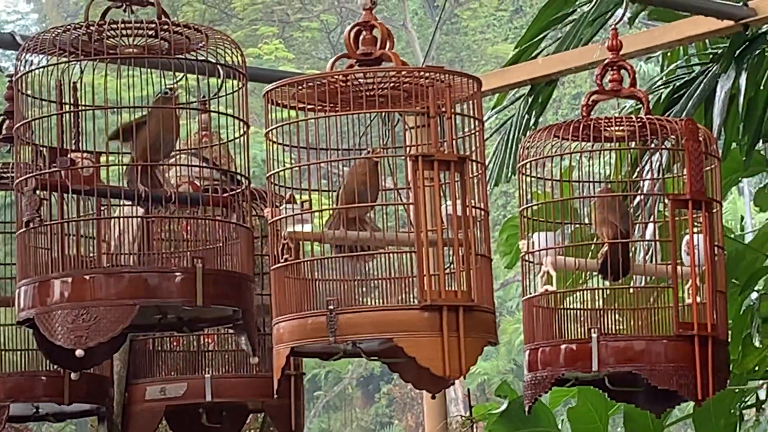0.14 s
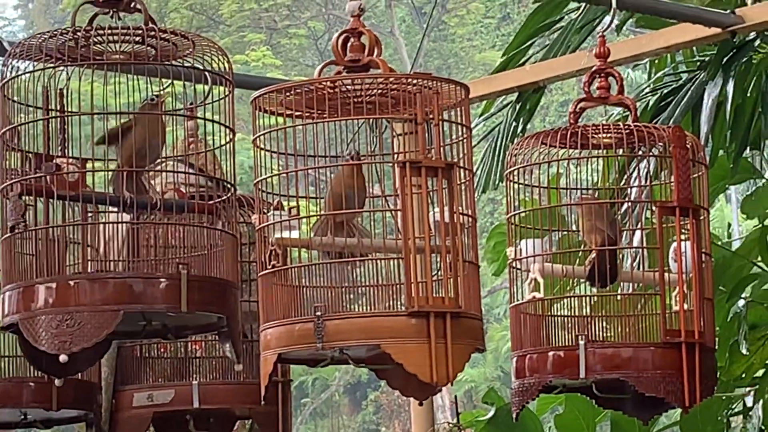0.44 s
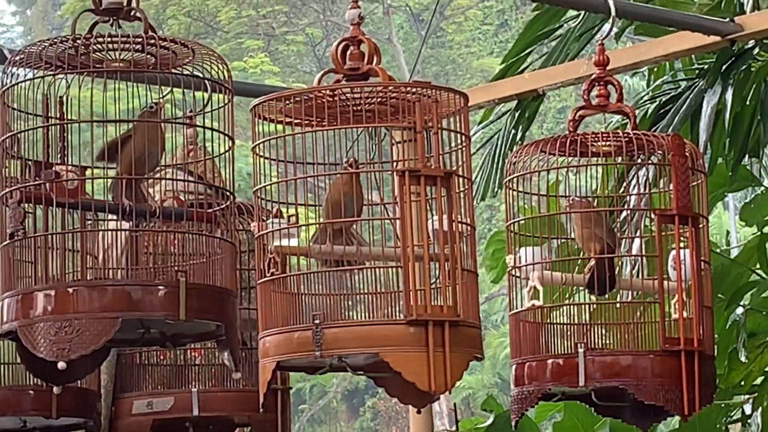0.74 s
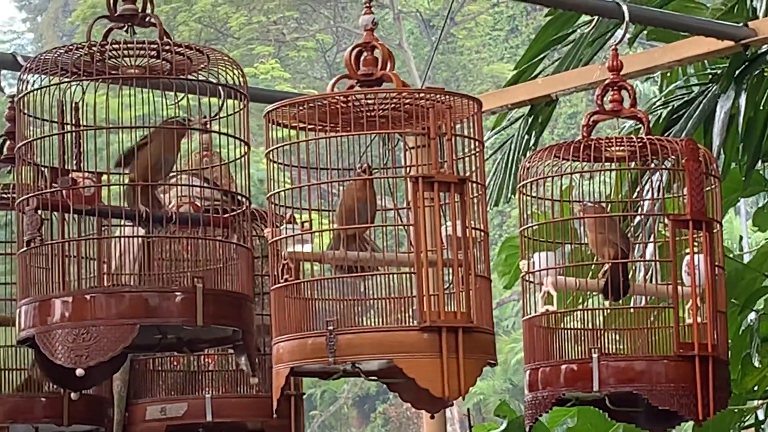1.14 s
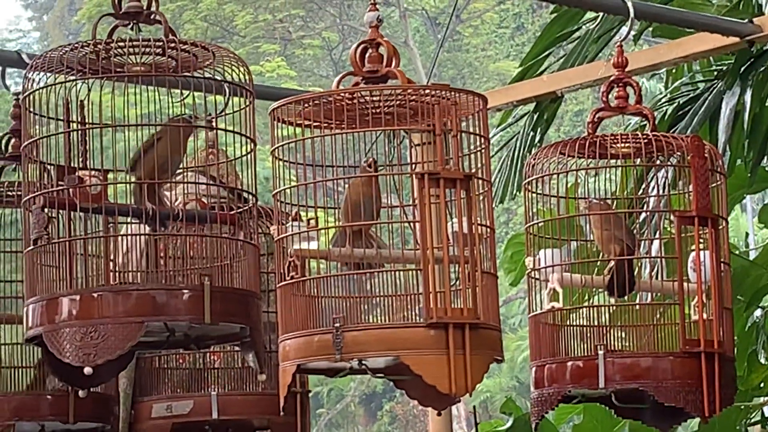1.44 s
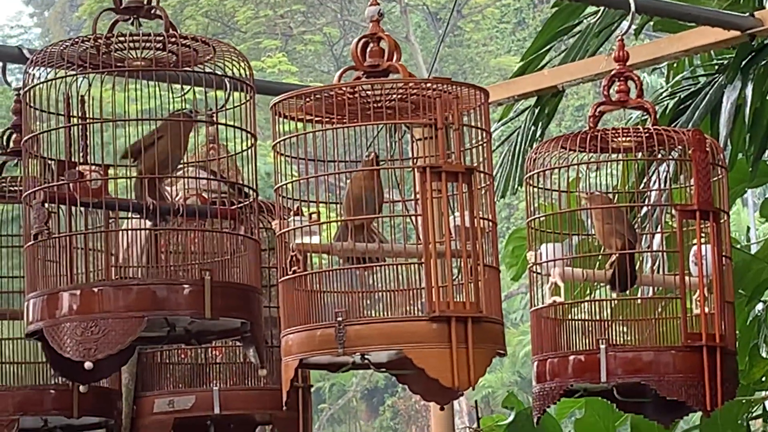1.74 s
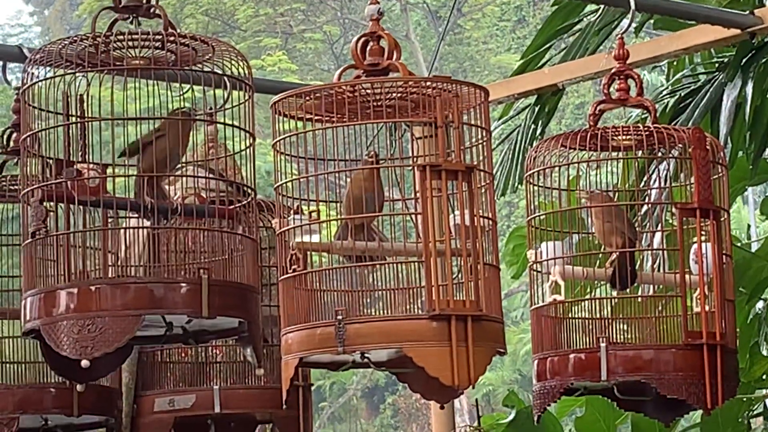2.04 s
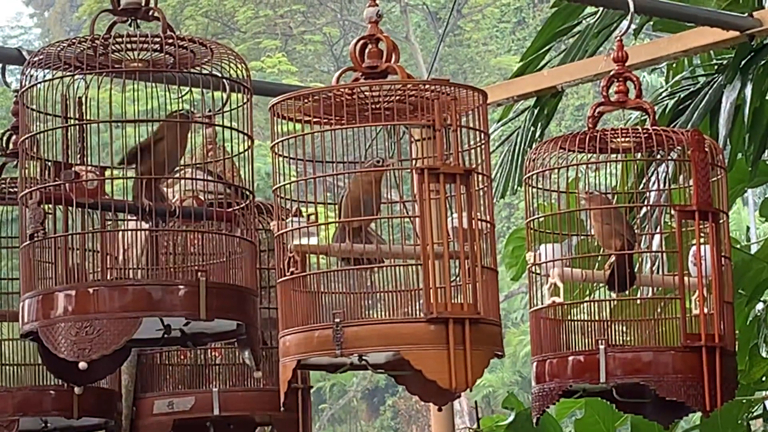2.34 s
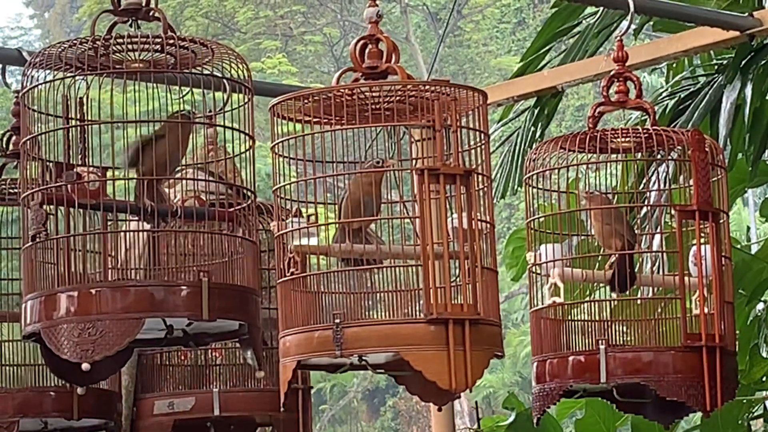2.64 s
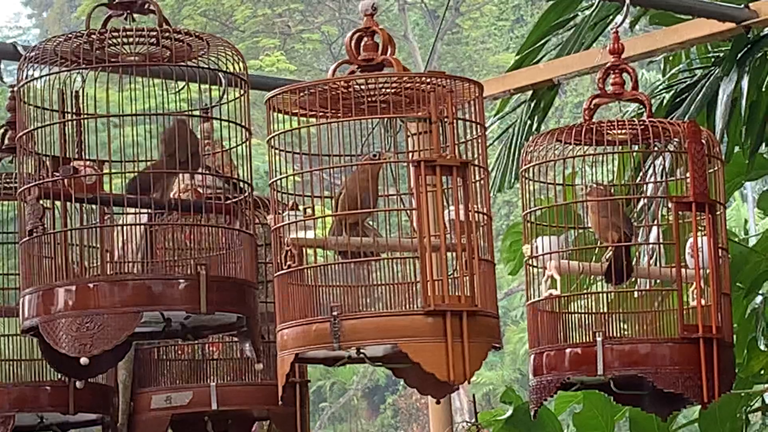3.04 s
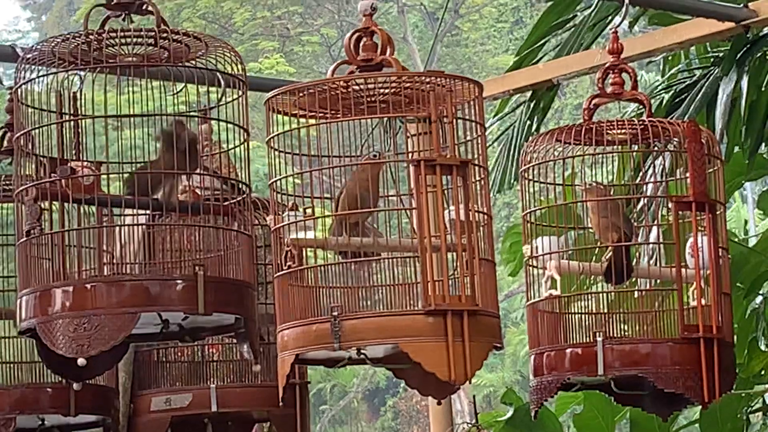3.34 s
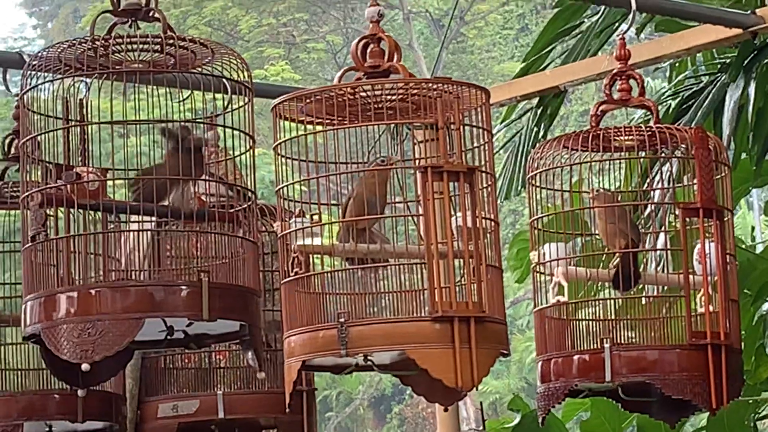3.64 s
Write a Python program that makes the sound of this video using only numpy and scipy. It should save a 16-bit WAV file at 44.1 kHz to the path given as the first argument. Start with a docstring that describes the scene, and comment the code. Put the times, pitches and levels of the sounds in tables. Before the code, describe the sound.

Several caged songbirds sing together under a garden roof: a close bird's loud swooping whistles, a quick repeated hooked note and buzzy warbles, with short leafy echoes, faint traffic rumble and air hiss, picked up in stereo.

```python
"""A garden roof, with several caged songbirds singing over one another: clear swept whistles, a repeated
hooked note, buzzy warbles, a wide rattle and fainter notes from farther cages, all in leafy echoes.
A distant engine revs now and then over a low traffic rumble and air hiss.
Voices and engine are sines on drawn pitch curves with overtones and a fast swing of pitch; the air in
the buzzes, the rumble and the hiss are shaped noise, and the echoes a dying burst of noise."""
import sys
import numpy as np
from scipy import signal
from scipy.fft import rfft, irfft, next_fast_len
from scipy.io import wavfile
from scipy.ndimage import uniform_filter1d, map_coordinates

SR = 44100
rng = np.random.default_rng(int(sys.argv[2]) if len(sys.argv) > 2 else 0)


def materialize(psi):
    """Save the field psi as 16-bit PCM at rate SR to the path in sys.argv[1].

    A 1-D psi becomes a single channel; in a 2-D psi each row is a channel.
    """
    bounded = np.clip(np.atleast_2d(psi).T, -1, 1)
    quanta = np.round(bounded * 32767).astype(np.int16)
    wavfile.write(sys.argv[1], SR, quanta)


N = 167580

# Levels of notes are those of the fundamental, before beak colour, flutter and panning.
# whistles of the nearest bird, one list per note: [t/s, f/Hz, level/dB]
NEAR_WHISTLES = [
    [(0.065, 4065, -47), (0.081, 3358, -24), (0.089, 3234, -22.5), (0.125, 2725, -22.5), (0.141, 3070, -21),
     (0.179, 4126, -19), (0.199, 3832, -20.5), (0.23, 2040, -28)],
    [(1.175, 3740, -50), (1.187, 4180, -29.5), (1.211, 4465, -15), (1.231, 4527, -21.5),
     (1.247, 4470, -15.5), (1.267, 4310, -22.5), (1.285, 3340, -32), (1.295, 3920, -41)],
    [(1.345, 4240, -38), (1.357, 4230, -18), (1.399, 4500, -22), (1.409, 4456, -18.5), (1.423, 4280, -21.5),
     (1.433, 4380, -24), (1.444, 3820, -26), (1.458, 3480, -30)],
    [(1.492, 4163, -23.5), (1.508, 4150, -23), (1.52, 4070, -20), (1.528, 4080, -21.5), (1.536, 4056, -20),
     (1.544, 3560, -20), (1.56, 3060, -25)],
    [(1.798, 2830, -48), (1.82, 2908, -21.5), (1.856, 3155, -22.5), (1.9, 3382, -22), (1.94, 3428, -22.5),
     (1.974, 3400, -24), (1.982, 3453, -24), (2.045, 3216, -32)],
    [(2.17, 3430, -39), (2.176, 3397, -26.5), (2.2, 3556, -16.5), (2.212, 3480, -21.5), (2.222, 3036, -18),
     (2.23, 2910, -27), (2.236, 2815, -24.5), (2.285, 2080, -35)],
    [(2.505, 1540, -39), (2.523, 1853, -38.5), (2.543, 2560, -33), (2.561, 2887, -22), (2.577, 2960, -23),
     (2.601, 2920, -16), (2.625, 2780, -35), (2.64, 2030, -32)],
    [(2.683, 2440, -27), (2.691, 2650, -30), (2.703, 2740, -43), (2.711, 2796, -21), (2.719, 2675, -20.5),
     (2.735, 2880, -27.5), (2.749, 3040, -21), (2.775, 3590, -34.5)],
    [(2.83, 4000, -27.5), (2.92, 3891, -15), (2.944, 3930, -17.5), (2.984, 2754, -26.5),
     (3.002, 2576, -24.5), (3.018, 2344, -36), (3.048, 2253, -23.5), (3.058, 2200, -57)],
    [(3.145, 3590, -40), (3.151, 3350, -39), (3.189, 3084, -20.5), (3.207, 3064, -43.5),
     (3.213, 2962, -14.5), (3.239, 2815, -24), (3.253, 2660, -25.5), (3.262, 2570, -45)],
    [(3.305, 2550, -29), (3.333, 2750, -22.5), (3.341, 3080, -16), (3.345, 2970, -39), (3.357, 2970, -20),
     (3.371, 3090, -26), (3.39, 3470, -24.5)],
    [(3.455, 4134, -28), (3.495, 3896, -23.5), (3.539, 3897, -16.5), (3.567, 3554, -19.5),
     (3.579, 3270, -36), (3.621, 2354, -28.5), (3.653, 2274, -27), (3.68, 2660, -80)],
    [(3.692, 4080, -37), (3.698, 4056, -27.5), (3.728, 4027, -18), (3.73, 3720, -24), (3.74, 3105, -35),
     (3.744, 2880, -31), (3.752, 1891, -31)],
]
# basic fast pitch swing of each near whistle: [rms swing f/Hz]
NEAR_SWING_HZ = [80, 15, 15, 20, 25, 30, 20, 25, 25, 20, 25, 25, 30]
# thin whistles of its neighbour, long ones and a brief last one, one list per note: [t/s, f/Hz, level/dB]
NEIGHBOUR_WHISTLES = [
    [(1.965, 1684, -33.5), (1.977, 1702, -42), (1.995, 2114, -33), (2.025, 2672, -20.5), (2.059, 2881, -27),
     (2.067, 2887, -21), (2.155, 3073, -31.5), (2.175, 2980, -31)],
    [(2.765, 2180, -31), (2.791, 2482, -28), (2.825, 2586, -32.5), (2.903, 2553, -24.5),
     (2.959, 2487, -29.5), (2.979, 2330, -28.5), (3.031, 1670, -41.5), (3.075, 1392, -57)],
    [(3.39, 2640, -22), (3.428, 2898, -22), (3.46, 2994, -30), (3.488, 3026, -17.5), (3.528, 3117, -19),
     (3.552, 3081, -19), (3.566, 2930, -21.5), (3.615, 2532, -25.5)],
    [(3.752, 3230, -40), (3.771, 3230, -31), (3.785, 3130, -16), (3.792, 3106, -29), (3.812, 3000, -20)],
]
# shape of the hooked note: [t/s after its start, f/Hz before scatter, level/dB over the repeat's own]
HOOK_SHAPE = [(0, 2750, -1), (.014, 2840, 4.5), (.024, 2857, 1.5), (.036, 2156, -6.5), (.052, 2100, -3.5),
              (.074, 2070, -13.5)]
# repeats of the hooked note: [t/s, level/dB]
HOOK_REPEATS = [(0.066, -34), (0.203, -30), (0.336, -32), (0.467, -32), (0.596, -30.5), (0.722, -32),
                (0.863, -32), (1.035, -31)]
# short plain notes from farther cages: [t/s, length/s, first f/Hz, last f/Hz, level/dB]
FAR_NOTES = [(0.438, 0.041, 3200, 3600, -36.5), (0.446, 0.1, 1740, 1855, -50.5),
             (0.801, 0.036, 1260, 1228, -41.5), (0.902, 0.04, 2970, 2780, -35),
             (1.049, 0.054, 1427, 1337, -49.5), (1.23, 0.021, 1293, 1207, -42.5),
             (1.259, 0.094, 2407, 2474, -41.5), (1.45, .05, 4620, 4300, -36),
             (1.85, 0.024, 2140, 1585, -37), (2.053, 0.055, 4010, 3110, -34.5),
             (2.104, 0.12, 2363, 2440, -39), (2.734, 0.035, 2093, 1586, -37),
             (3.114, 0.053, 2454, 2445, -39), (3.155, 0.054, 1890, 1960, -44.5),
             (3.687, 0.028, 2280, 2334, -37.5)]
# buzzy warbles: [t/s, length/s, f/Hz at start, a third, two thirds and end, swing f/Hz before dwell,
# warbles per s before raggedness, mid level/dB, air level/dB before its puffs]
BUZZES = [(0.194, 0.13, 3500, 3980, 4360, 4280, 486, 146.4, -37, -34),
          (0.294, 0.058, 3004, 3260, 3387, 3300, 201, 151.2, -26.5, -47),
          (0.464, 0.15, 3580, 4500, 4390, 4310, 360, 142.4, -34, -34.5),
          (0.574, 0.085, 2874, 3220, 3317, 3410, 208, 140, -28, -37),
          (0.791, 0.16, 3726, 4390, 4275, 4060, 330, 162.8, -33, -33.5),
          (0.915, 0.087, 3000, 3122, 3393, 3420, 205, 142.3, -29, -45),
          (1.247, 0.14, 4680, 4850, 5010, 4590, 252, 159, -32, -45.5),
          (1.373, 0.08, 1754, 1762, 1764, 1686, 153, 108, -39.5, -36),
          (1.49, 0.17, 1650, 1853, 1908, 2105, 152, 90.8, -44.5, -40.5),
          (2.117, 0.19, 4765, 4825, 4800, 3760, 260, 145.7, -30.5, -41.5),
          (2.276, 0.15, 3140, 4155, 4120, 3970, 217, 162.4, -23.5, -42),
          (2.274, 0.14, 2930, 2880, 2808, 2785, 348, 130.2, -34.5, -52),
          (2.428, 0.11, 1975, 1870, 1920, 1885, 290, 130.7, -40.5, -68),
          (3.062, 0.2, 4440, 4904, 4810, 4510, 260, 143.4, -31, -73),
          (3.17, 0.13, 4470, 4250, 4030, 3380, 198, 140.8, -30.5, -65),
          (3.261, 0.036, 3050, 2940, 2900, 2880, 353, 112, -30, -69),
          (3.414, 0.082, 1710, 1736, 1872, 2000, 119, 132, -45.5, -57)]
# rattle, its pitch thrown between two nominal limits: [t/s, low f/Hz, high f/Hz, level/dB]
RATTLE_CURVE = [(1.41, 2008, 2900, -39), (1.48, 2168, 3406, -37.5), (1.559, 2504, 4080, -34),
                (1.649, 2483, 3657, -31.5), (1.698, 2772, 3240, -37.5), (1.78, 2620, 3530, -79)]

# overtones, before flutter and glide dulling: [multiple of the pitch, level/dB against the fundamental]
WHISTLE_OVERTONES = [(2, -22.5), (3, -24), (4, -32.5)]
BUZZ_OVERTONES = [(2, -21), (3, -31)]
RATTLE_OVERTONES = [(2, -27), (3, -30)]
# neighbour, hooked note and far cages, same columns
THIN_OVERTONES = [(2, -44), (3, -38)]
# half steps between the overtones of the fifth near whistle, same columns
HALF_STEPS = [(1.5, -29.5), (2.5, -26), (3.5, -41)]
# added octave of the first near whistle, same columns
BRIGHT_OCTAVE = [(2, -28.5)]
# overtones of the engine's firing tone, same columns
ENGINE_ORDERS = [(2, -10.5), (4, -19.5)]

# breath noise in a buzz: [f/Hz, relative level/dB per Hz]
BUZZ_AIR = [(1200, -61.5), (2300, 4), (4500, 2.5), (5900, 9), (8500, 2.5), (10500, -2), (13300, -3),
            (14600, -6.5), (15500, -17.5)]
# colour of throat and beak: [f/Hz, level/dB]
BEAK = [(1200, 0), (2000, 1.5), (3500, -1), (4800, -3.5), (5600, -11), (7000, -11), (8500, -1), (13500, -4),
        (15500, -15)]
# stereo placing of each voice: {voice: left gain level/dB, the right gets the opposite}
PAN_DB = {"near": 1.7, "next": 1, "hook": 2.5, "far": 0.5, "buzz": 1.2, "hiss": -2.3, "rattle": 3}
# echo send of each voice: {voice: echo level/dB}
ECHO_DB = {"near": -4.5, "next": -4.5, "hook": -4.5, "far": -3, "buzz": -1.5, "hiss": 2, "rattle": 1}
# decay of the garden echoes: [f/Hz, time to fall 60 dB t/s]
GARDEN_DECAY = [(1500, 0.3), (4000, 0.26), (12000, 0.053)]

# revs of the distant engine, one list each: [t/s, firing f/Hz, level/dB before flutter]
ENGINE_REVS = [
    [(0.55, 66.3, -22), (0.586, 65.35, -29), (0.696, 58.5, -35), (0.958, 68.62, -30.5),
     (1.184, 75.83, -34.5), (1.516, 75.6, -39.5), (1.55, 75.7, -41)],
    [(3.1, 58.4, -51), (3.106, 58.07, -50.5), (3.376, 65.2, -38.5), (3.504, 60.04, -39), (3.548, 62.8, -44),
     (3.646, 66.2, -38.5), (3.8, 69, -27.5)],
]
# traffic rumble: [f/Hz, relative level/dB per Hz]
RUMBLE = [(26, -17), (45, 1.5), (135, -3.5), (210, -9), (378, -14), (471, -16), (522, -15.5), (1370, -22),
          (1500, -24), (1950, -25.5), (3300, -120)]
# slow swell of the rumble, before RUMBLE_LIFT_DB: [t/s, level/dB]
RUMBLE_SWELL = [(0.0, -41.5), (0.55, -40.5), (0.68, -40), (1.38, -39), (1.69, -38), (2.04, -40),
                (3.8, -41.5)]
# deepest rumble: [f/Hz, relative level/dB per Hz]
DEEP_RUMBLE = [(12, -28), (22, -1.5), (40, -2.5), (60, -16), (90, -120)]
# uneven level of the deepest rumble, with quick rises and drops: [t/s, level/dB]
DEEP_LEVEL = [(0.0, -77), (0.06, -42.5), (0.68, -37), (0.73, -63), (0.82, -43.5), (3.8, -56)]
# air hiss: [f/Hz, relative level/dB per Hz]
AIR = [(710, -85.5), (1200, -23.5), (2820, -9.5), (5420, -27.5), (8960, -24.5), (10400, -29.5),
       (11200, -98), (12200, -32), (13600, -33), (15500, -60)]
# likeness of left and right in the noise: [f/Hz, correlation from -1 to 1]
STEREO_LIKENESS = [(60, 0.91), (120, 0.69), (240, 1), (480, 0.22), (950, -0.18), (1890, 0.36),
                   (3770, -0.14), (7520, -0.3), (15000, 0.16)]
# narrow dip in the treble: [f/Hz, level/dB]
TREBLE_DIP = [(10300, 0.5), (11000, -9), (11900, -16.5), (12500, 4.5)]

EDGE_S, SOFT_EDGE_S, BUZZ_EDGE_S = .007, .012, .035  # fade at each end of a note
AIR_EDGE_S, AIR_FADE_S = .08, .12  # rise and fall of the air in a buzz
GLIDE_SWING_S = .0018  # added swing in Hz per (Hz per s) of glide
GLIDE_DULLS_DB = 8  # overtones fade by this for each 10 kHz per s of glide
OVERTONE_BLUR = .35  # unsteadiness of an overtone's phase, radians per multiple
HOOK_SCATTER = .022  # pitch spread from hook to hook, as a fraction
BUZZ_DWELL = .25  # a buzz lingers at the top of its swing and darts through the bottom
BUZZ_RAGGED, RATTLE_RAGGED = .07, .2  # unevenness of the swing
BUZZ_SWELL_DB, AIR_PUFF_DB = 3.5, 5  # rise through a buzz; height of its air puffs
RATTLE_PER_S = 95  # swings per s before raggedness
AIR_DB, RUMBLE_LIFT_DB, AIR_PATCHY_DB = -40, 2, 4.5
TOP_HZ = 15600


def near_whistles():
    """Clear swept whistles: a quavering sine whose swing widens with the speed of its glide."""
    out = np.zeros(N)
    for k, (rows, swing_hz) in enumerate(zip(NEAR_WHISTLES, NEAR_SWING_HZ)):
        overtones = WHISTLE_OVERTONES
        dull_db = GLIDE_DULLS_DB
        if k == 0:  # this octave lasts through the glides
            overtones = overtones + BRIGHT_OCTAVE
            dull_db = 0
        if k == 4:
            overtones = overtones + HALF_STEPS
        sing(out, rows, overtones, EDGE_S, swing_hz, rate=190, ragged=.333, flutter_db=1.5,
             glide_s=GLIDE_SWING_S, dull_db=dull_db)
    return out


def neighbour_whistles():
    """Thin-toned whistles, long ones and a brief last one: almost pure sines with a ragged quaver."""
    out = np.zeros(N)
    for rows in NEIGHBOUR_WHISTLES:
        sing(out, rows, THIN_OVERTONES, EDGE_S, swing_hz=25, rate=130, ragged=.33, flutter_db=3.0)
    return out


def hooked_notes():
    """One short hooked pitch curve, repeated a little higher or lower each time."""
    out = np.zeros(N)
    for start, db in HOOK_REPEATS:
        transpose = 1 + HOOK_SCATTER * rng.standard_normal()
        rows = np.multiply(HOOK_SHAPE, [1, transpose, 1]) + [start, 0, db]
        sing(out, rows, THIN_OVERTONES, EDGE_S, swing_hz=51, rate=250, ragged=.589, flutter_db=1.5,
             glide_s=GLIDE_SWING_S / 2)
    return out


def far_notes():
    """Faint short notes with soft edges, each a plain slide between two pitches."""
    out = np.zeros(N)
    for start, length, first_hz, last_hz, db in FAR_NOTES:
        rows = [(start, first_hz, db), (start + length, last_hz, db)]
        sing(out, rows, THIN_OVERTONES, SOFT_EDGE_S, swing_hz=35, rate=140, ragged=.39, flutter_db=2.0)
    return out


def buzzes():
    """Buzzy warbles: the pitch swings so fast and wide that it blurs into a buzz."""
    out = np.zeros(N)
    for start, length, *pitch, swing_hz, rate, db, _ in BUZZES:
        rows = [(start + length * k / 3, hz, db + BUZZ_SWELL_DB * (k / 3 - .5))
                for k, hz in enumerate(pitch)]
        sing(out, rows, BUZZ_OVERTONES, BUZZ_EDGE_S, swing_hz / np.sqrt(2), rate, ragged=BUZZ_RAGGED,
             flutter_db=3.5, lean_db=2.0, dwell=BUZZ_DWELL)
    return out


def buzz_air():
    """Breath in each buzz: shaped noise that puffs once a warble and outlasts the tone a little."""
    out, t = np.zeros(N), np.arange(N) / SR
    air = unit(rush(BUZZ_AIR, AIR_PATCHY_DB).sum(axis=0))
    air = air * amp(1.4 * wobble(N, 110))
    for start, length, *_, rate, _, air_db in BUZZES:
        puffs = amp(air_db + AIR_PUFF_DB * np.sin(2 * np.pi * rate * t))
        rise = (t - start) / AIR_EDGE_S
        fall = (start + length - t) / AIR_FADE_S + .5
        fade = np.sin(np.pi / 2 * np.clip(np.minimum(rise, fall), 0, 1)) ** 2
        out += puffs * fade * air
    return out


def rattle():
    """One wide rattle: the pitch is thrown between two limits, louder at the top."""
    out = np.zeros(N)
    s, low, high, db = np.transpose(RATTLE_CURVE)
    rows = np.transpose([s, (low + high) / 2, db])
    sing(out, rows, RATTLE_OVERTONES, BUZZ_EDGE_S, (high - low) / 2 / np.sqrt(2), RATTLE_PER_S,
         ragged=RATTLE_RAGGED, flutter_db=4.0, lean_db=4.0)
    return out


def birds():
    """One dry track for each voice, through the colour of throat and beak."""
    voices = {"near": near_whistles(), "next": neighbour_whistles(), "hook": hooked_notes(),
              "far": far_notes(), "buzz": buzzes(), "hiss": buzz_air(), "rattle": rattle()}
    return {name: filtered(dry, lambda hz: amp(along(BEAK, hz))) for name, dry in voices.items()}


def garden(x):
    """Roof, cages and leaves answer: a stereo noise tail in which each frequency dies at its own speed."""
    hz, t, z = signal.stft(rng.standard_normal((2, SR // 2)), SR, nperseg=256)
    decay = amp(-60 * t / along(GARDEN_DECAY, hz)[:, None])
    tail = signal.istft(z * decay, SR, nperseg=256)[1]
    tail = tail / np.linalg.norm(tail[0])
    delayed = np.pad(x, (130, 0))  # samples, about 3 ms
    return signal.fftconvolve(delayed[None], tail, axes=1)[:, :N]


def engine():
    """A far engine: low firing tone with its orders, slightly unsteady."""
    out = np.zeros(N)
    for rows in ENGINE_REVS:
        sing(out, rows, ENGINE_ORDERS, edge_s=.08, swing_hz=1.5, rate=9, ragged=.8, flutter_db=1.2)
    return out


def traffic():
    """Traffic rumble: low noise that swells slowly, over a deepest layer with quick rises and drops."""
    rumble = rush(RUMBLE + [(3000, -120)], patchy_db=2.0)  # the rumble fades out toward about 3 kHz
    rumble = amp(RUMBLE_LIFT_DB) * level_curve(RUMBLE_SWELL) * rumble
    return rumble + level_curve(DEEP_LEVEL) * rush(DEEP_RUMBLE, patchy_db=0.0)


def air_hiss():
    """Air: patchy shaped noise at one overall level, kept out of the bass."""
    return amp(AIR_DB) * rush([(500, -120)] + AIR, AIR_PATCHY_DB)


def sing(out, rows, overtones, edge_s, swing_hz=0, rate=150, ragged=0., flutter_db=0., lean_db=0.,
         glide_s=0., dwell=0., dull_db=GLIDE_DULLS_DB):
    """Add a sine on a pitch curve with overtones, fast pitch swing, level flutter and a lean to its top."""
    s, hz, db = np.transpose(rows)
    t = np.arange(max(round(s[0] * SR), 0), min(round(s[-1] * SR), N)) / SR
    n = len(t)
    pitch = np.interp(t, s, hz)
    glide = np.abs(uniform_filter1d(np.gradient(pitch) * SR, size=500))  # Hz per s

    beat = 2 * np.pi * np.cumsum(rate * (1 + ragged * wobble(n, rate / 2))) / SR
    shape = np.sqrt(2) * (np.sin(beat) + dwell * np.cos(2 * beat)) + ragged * wobble(n, 4 * rate)
    swing = (np.interp(t, s, swing_hz + 0 * s) + glide_s * glide) * shape
    smooth_pitch = uniform_filter1d(pitch, size=300, mode="nearest")
    phase = 2 * np.pi * np.cumsum(smooth_pitch + swing) / SR + rng.uniform(0, 2 * np.pi)

    blur = OVERTONE_BLUR * wobble(n, 70) * (hz.mean() > 500)  # the low engine keeps its orders steady
    tone = np.sin(phase)
    for multiple, gain_db in overtones:
        gain = amp(gain_db + 3.5 * wobble(n, 44.94) - dull_db * glide / 10 ** 4)
        tone = tone + gain * np.sin(multiple * (phase + blur))

    level_db = uniform_filter1d(np.interp(t, s, db), size=200, mode="nearest")
    level_db = level_db + lean_db * np.sin(beat) + flutter_db * wobble(n, 2 * rate)
    edge = np.sin(np.pi / 2 * np.clip(np.minimum(t - s[0], s[-1] - t) / edge_s, 0, 1))
    out[round(t[0] * SR):][:n] += np.sqrt(2) * amp(level_db) * edge * tone


def rush(spectrum, patchy_db):
    """Stereo noise of rms 1 with patches of random gain and a left-right likeness set by frequency."""
    z = signal.stft(rng.standard_normal((2, N)), nperseg=512)[2]
    field = rng.standard_normal(z.shape[1:])
    field = uniform_filter1d(uniform_filter1d(field, 6, 0), 14, 1)
    pair = signal.istft(z * amp(patchy_db * unit(field)), nperseg=512)[1][:, :N]

    def mid_side(hz):
        turn = np.arccos(np.clip(along(STEREO_LIKENESS, hz), -1, 1)) / 2
        return amp(along(spectrum, hz)) * [np.cos(turn), np.sin(turn)]

    mid, side = filtered(pair, mid_side)
    return unit(np.array([mid + side, mid - side]))


def level_curve(rows):
    """(s, dB) points as a gain per sample."""
    s, db = np.transpose(rows)
    return amp(np.interp(np.arange(N) / SR, s, db))


def wobble(n, rate):
    """A smooth random curve of n samples, rate knots a second, at most 900."""
    knots = rng.standard_normal(4096)
    return map_coordinates(knots, [np.arange(n) * min(rate, 900) / SR])


def filtered(x, response):
    """x times a response of frequency, with room for the ringing."""
    m = next_fast_len(N + SR // 2)
    return irfft(rfft(x, m) * response(np.fft.rfftfreq(m, 1 / SR)), m)[..., :N]


def along(points, hz):
    """Read (Hz, value) points on a log frequency axis."""
    f, v = np.transpose(points)
    return np.interp(np.log(hz + 1), np.log(f + 1), v)


def amp(db):
    """Decibels to linear gain."""
    return 10 ** (np.asarray(db) / 20)


def unit(x):
    """Scale to rms 1."""
    return x / np.sqrt(np.mean(x ** 2) + 1e-20)


def scene():
    """Each voice panned dry with its echoes, over engine, traffic and air."""
    out = traffic() + air_hiss() + engine()
    for name, dry in birds().items():
        panned = dry * amp([[PAN_DB[name]], [-PAN_DB[name]]])
        out = out + panned + amp(ECHO_DB[name]) * garden(dry)
    return out


def record(dry):
    """The treble dips in one band, and nothing is kept above the band limit."""
    return filtered(dry, lambda hz: amp(along(TREBLE_DIP, hz)) * (hz < TOP_HZ))


dry = scene()
out = record(dry)
materialize(out)
```